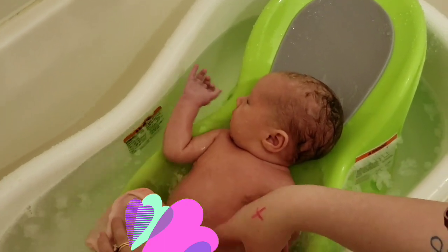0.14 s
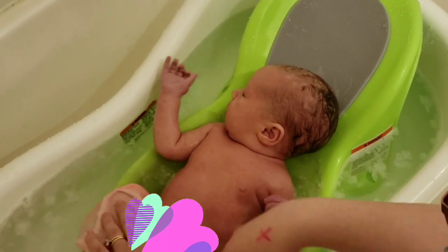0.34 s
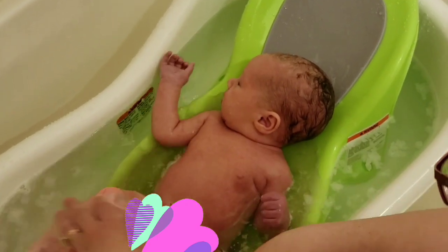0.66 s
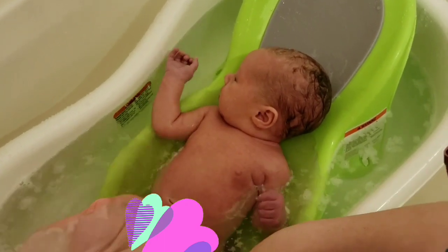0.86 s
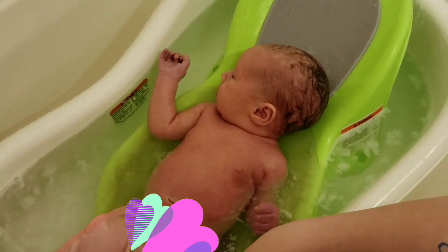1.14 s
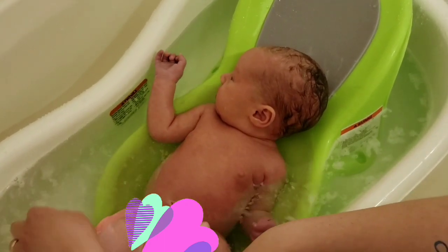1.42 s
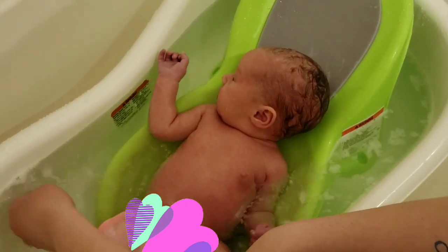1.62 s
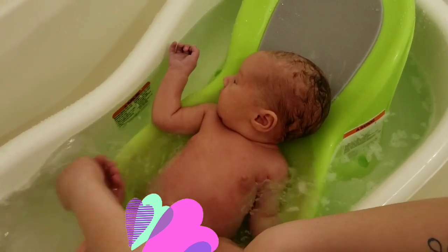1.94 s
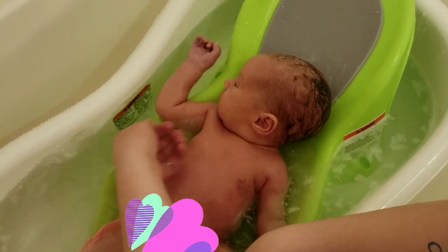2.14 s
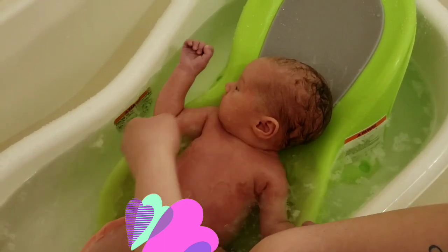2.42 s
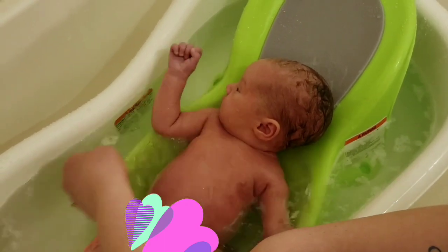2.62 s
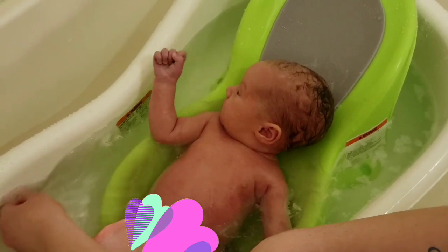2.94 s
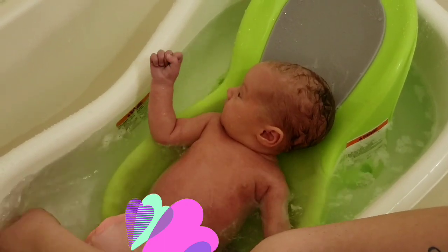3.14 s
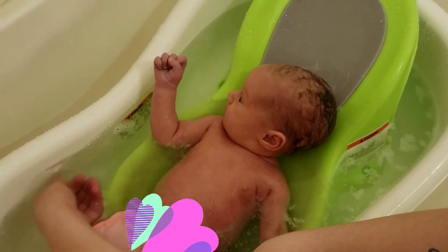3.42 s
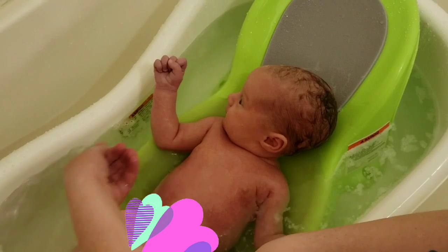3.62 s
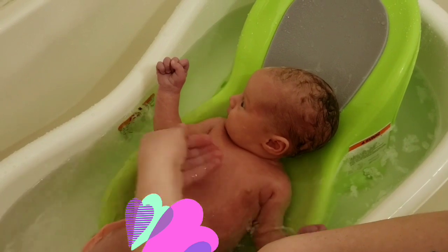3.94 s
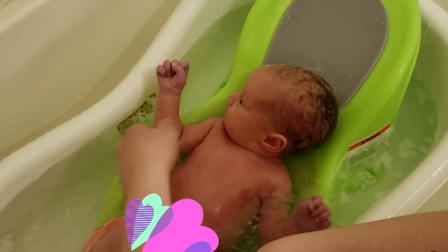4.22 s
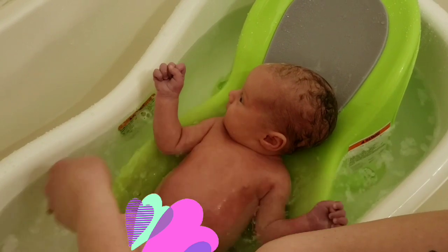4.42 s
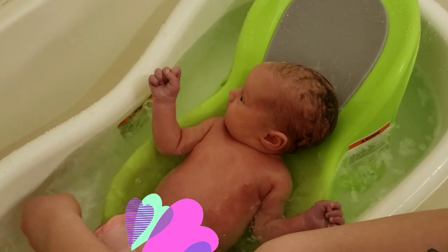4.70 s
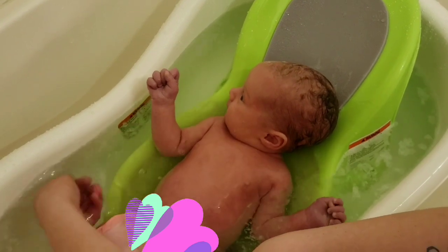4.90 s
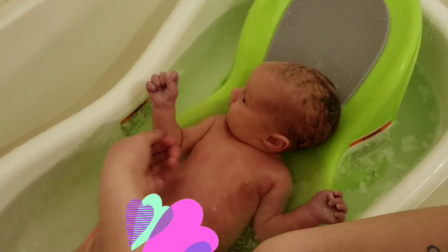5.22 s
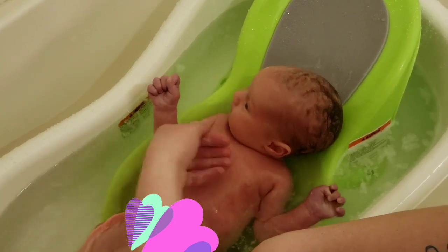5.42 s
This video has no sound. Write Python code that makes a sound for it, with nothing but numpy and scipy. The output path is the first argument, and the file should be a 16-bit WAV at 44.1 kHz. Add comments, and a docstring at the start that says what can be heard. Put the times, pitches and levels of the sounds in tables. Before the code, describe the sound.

Bathwater plops, drips and splashes lightly in a plastic tub as a hand scoops it, over a low fan hum.

```python
"""Small tiled bathroom: a hand scoops and pours bathwater in a plastic tub, close by.
Bubbles plop as short rising sines; droplets spatter as bursts of tiny clicks.
A thump and a knock ring the tub's modes; something wet squeaks thinly at the end.
Behind it, a fan hums through the room's low resonances."""
import sys
import numpy as np
from scipy import signal
from scipy.fft import rfft, irfft
from scipy.io import wavfile
from scipy.ndimage import uniform_filter1d

SR = 44100
rng = np.random.default_rng(int(sys.argv[2]) if len(sys.argv) > 2 else 0)


def unload_wav(signal):
    """Save mono or channel-first audio to the path in sys.argv[1] as 16-bit WAV at rate SR, clipped to [-1, 1]."""
    wavfile.write(
        sys.argv[1],
        SR,
        np.round(np.clip(np.atleast_2d(signal).T, -1, 1) * 32767).astype(np.int16),
    )


N = 245195
T = np.arange(N) / SR
HZ = np.maximum(np.fft.rfftfreq(N, 1 / SR), 1)

# fan noise spectrum: freq_hz, gain_db
FAN_SPECTRUM = [(12, -80), (20, -32), (24, -21), (35, -7.5), (59, -4.5), (72, -5.5), (92, -13.5),
                (112, -15.5), (225, -17), (390, -21.5), (427, -22.5), (573, -41), (797, -39), (1600, -54.5),
                (2080, -94), (3520, -120)]
# room resonances: freq_hz, width_hz, lift_db
ROOM_MODES = [(164.2, 31, 10.5), (226.2, 13, 7.5), (274, 65, 6.5), (418, 71, 2.5), (496, 78, 9),
              (780, 25, 3), (803, 14, 4), (985, 217, 6.5), (1340, 61, 10)]
# hiss spectrum: freq_hz, gain_db
HISS_SPECTRUM = [(940, -17), (1600, -1), (2190, -3), (2410, -5), (2920, -8), (3530, -6), (4190, -5.5),
                 (4570, -11.5), (6950, -17), (7650, -11.5), (8660, -15), (12300, -8), (14000, -14),
                 (15600, -20.5)]
# background left/right likeness: freq_hz, correlation
NOISE_CORRELATION = [(50, 0.97), (130, 1), (290, 0.91), (640, 0.5), (1400, -0.29), (2500, 0.089),
                     (6000, 0.14)]
# background balance, pan = left minus right: freq_hz, pan_db
NOISE_PAN = [(60, 5), (110, 0), (200, 2), (380, -0.5), (700, 6.5), (1290, 4.5), (2380, 1), (4400, 1.5),
             (8120, 1.5), (15000, -1.5)]
# low hum envelope: time_s, level_db
DRONE_LEVELS = [(0.0, -44), (0.52, -50.5), (0.56, -40), (0.74, -51.5), (1.08, -44), (1.15, -68),
                (1.21, -44.5), (1.47, -40), (1.61, -50.5), (2.68, -50), (2.82, -39), (2.91, -59),
                (3.13, -47.5), (3.51, -45), (3.59, -62), (3.79, -40), (4.07, -63.5), (4.96, -43.5),
                (5.22, -53), (5.25, -46.5), (5.34, -48), (5.4, -68), (5.47, -45), (5.56, -65)]
# higher hum envelope: time_s, level_db
WHIRR_LEVELS = [(0.0, -67.5), (0.34, -54.5), (0.42, -65), (0.74, -56), (0.84, -84), (0.9, -62), (2.42, -62),
                (2.69, -68), (2.82, -51), (3.05, -68.5), (3.11, -55), (3.39, -75), (3.48, -51.5),
                (3.53, -73), (4.07, -59), (4.1, -69.5), (4.52, -50.5), (4.57, -69), (4.91, -59.5),
                (5.2, -67.5), (5.53, -61), (5.56, -68)]
# tile reverb bands: centre_hz, t60_s, gain_db
TILE_BANDS = [(148, 0.12, -3), (500, 0.25, 0.5), (1550, 0.26, 4.5), (3900, 0.21, 5.5), (10300, 0.24, -2)]
# air modes between water and tub walls: freq_hz, gain_db, t60_s
CAVITY_MODES = [(1180, -36, 0.17), (1302, -39.5, 0.18), (1800, -35.5, 0.081), (2180, -60, 0.18)]
# wet squeak glide: time_s, pitch_hz, level_db
SQUEAK_GLIDE = [(5.425, 10800, -100), (5.446, 10875, -85), (5.464, 11040, -83), (5.476, 11190, -75),
                (5.512, 11700, -75), (5.53, 11860, -71.5), (5.546, 11950, -69.5), (5.56, 11800, -67)]
# plastic shell modes: freq_hz, gain_db, t60_s
TUB_MODES = [(62, -4.5, 0.075), (165, -0.5, 0.035), (248, 3, 0.035), (396, -0.5, 0.03), (720, -6, 0.016),
             (814, 0, 0.028), (930, -14, 0.027), (1010, -17, 0.026), (1180, -7.5, 0.03), (1250, -6, 0.013),
             (1380, -15, 0.024), (1660, -17, .015), (2480, -5.5, 0.0025), (3800, -1, 0.0018)]
# blows on the tub, less bass near the stiff rim: start_s, level_db, contact_ms, low_modes_db
TUB_BLOWS = [(1.006, -35, 2.94, 0), (1.019, -37, 14, 2), (1.044, -45, 3.1, 0), (1.069, -30.5, 10, -0.5),
             (1.086, -43, 8.4, 3), (1.1756, -46, 0.36, -1), (1.181, -38, 0.77, -2)]
# droplet click spectrum: freq_hz, gain_db
DROPLET_SPECTRUM = [(1500, -13.5), (3000, -17.5), (6000, -17.5), (8400, -10), (9100, -2), (10500, -1),
                    (12000, -1.5), (14000, -10.5), (16000, -20)]
# water running off the fingers, one envelope per run: time_s, level_db
TRICKLES = [
    [(1.74, -80), (1.85, -99), (2.0, -100)],
    [(2.15, -81), (2.28, -79), (2.4, -91), (2.52, -77.5), (2.65, -90), (2.8, -91)],
    [(3.05, -91), (3.17, -93), (3.3, -100), (3.45, -100)],
    [(3.54, -78), (3.62, -81.5), (3.75, -72.5), (3.9, -79), (4.02, -87), (4.12, -92), (4.22, -95),
     (4.35, -81), (4.45, -103)],
    [(4.58, -100), (4.7, -78.5), (4.85, -107), (5.05, -102), (5.15, -103), (5.25, -102)],
]
# droplets bursting on the water: start_s, level_db, ring_hz, large_drops_db, pan_db
DROPLET_BURSTS = [(1.174, -64, 9600, -9.5, 2), (1.748, -65, 9200, -24, 4), (1.79, -68, 10000, -14, -2),
                  (1.8026, -50, 10300, -24, 0), (2.163, -71, 9120, -15, 4), (2.2208, -67, 8900, -19, 1.5),
                  (2.2598, -63, 12160, -17, 1), (2.304, -64, 9450, -15, 4), (2.4432, -47.5, 12400, -16, -1),
                  (2.5608, -67, 11810, -18, 1), (2.584, -58.5, 10900, -17, -4), (2.8943, -83, 9500, -17, 3),
                  (3.078, -71.5, 9510, -10, 2), (3.113, -57.5, 11900, -17, -1),
                  (3.1625, -64.5, 12200, -31, -4), (3.2212, -66, 11800, -19, -2),
                  (3.3727, -77, 10400, -21, -1), (3.55, -80, 10500, -20, 0), (3.562, -64, 9600, -14, 4),
                  (3.57, -67, 10200, -18, 3), (3.6473, -72, 9420, -8, 0), (3.675, -74, 9100, -14, 1),
                  (3.708, -67, 10700, -18, -5), (3.7337, -54.5, 10300, -27, -2),
                  (3.819, -54.5, 12100, -26, -6), (3.857, -57.5, 9370, -21, 0),
                  (3.9115, -63, 11690, -18, -1.5), (3.962, -68, 12000, -20, -3),
                  (3.971, -53.5, 10300, -22, 1), (4.1634, -67.5, 11900, -25, -5),
                  (4.2026, -72, 11960, -27, -6), (4.2427, -73, 11500, -22, -2.5),
                  (4.2722, -67.5, 9640, -15, 6), (4.308, -68, 11800, -26, -6), (4.5999, -84, 9500, -22, 2),
                  (4.634, -70, 9200, -18, 5), (4.641, -62.5, 9300, -21, -2), (4.736, -61.5, 10000, -15, 0),
                  (5.0855, -78.5, 9500, -11, -0.5), (5.1264, -67, 9700, -15, -1)]
# bubbles closing under the surface: start_s, level_db, pitch_hz, ring_cycles, pan_db
PLOPS = [(1.003, -67.5, 3820, 11, 2), (1.004, -69, 7800, 20, 0), (1.749, -71, 5300, 14, 2),
         (1.805, -58, 5740, 11, 2), (1.81, -61.5, 2030, 5.7, 5), (2.031, -60, 1280, 3, 5),
         (2.036, -64, 1760, 3.6, -1), (2.144, -53.5, 1250, 5.9, 9), (2.158, -39, 1237, 8.7, 4),
         (2.1574, -67, 5140, 42, 4), (2.1576, -70, 6600, 40, 1), (2.159, -68, 2660, 14, 3),
         (2.222, -55.5, 6900, 7.4, 5), (2.226, -63, 7500, 14, 1), (2.26, -55.5, 2810, 6, 7),
         (2.266, -60, 2290, 11, 1), (2.308, -56, 3840, 9, 5), (2.325, -61.5, 2880, 9, 6),
         (2.395, -66, 4700, 10, 1), (2.446, -57, 2656, 7.1, 4), (2.462, -51.5, 5300, 10, 2),
         (2.5858, -54, 2420, 8, 3.5), (2.92, -68, 2230, 8, -3), (3.027, -70, 2920, 12, 7),
         (3.067, -61, 1640, 9.1, 9), (3.114, -62.5, 1600, 5.4, 5), (3.1145, -69, 4500, 9, 1),
         (3.115, -60.5, 2810, 7.5, 6), (3.618, -61, 2620, 8.1, 5), (3.6223, -47.5, 2180, 9.6, -1),
         (3.64, -60, 2010, 7.5, 0), (3.654, -49, 1440, 7.5, -1), (3.662, -54.5, 2530, 5.3, 2),
         (3.675, -42.5, 2090, 5.9, 0), (3.68, -50, 1590, 7, -5), (3.688, -46.5, 1170, 7.5, 1),
         (3.745, -62, 1780, 8.4, 4), (3.768, -53, 1850, 14, 0), (3.8, -65, 1790, 15, 0),
         (3.832, -76, 1800, 12, 1), (3.972, -63, 5870, 8, 0), (3.978, -60, 2850, 9, 4),
         (3.985, -66, 1930, 8.8, 1), (4.272, -61.5, 2730, 5.7, 3), (4.351, -63, 2080, 3, 0),
         (4.354, -64, 1340, 6.5, 4), (4.74, -64, 4900, 7, 0), (5.1248, -59, 4120, 9, 4),
         (5.14, -70, 4250, 7, 2), (5.128, -69, 2100, 8, -1), (5.153, -60, 4450, 7, -1),
         (5.165, -66, 4700, 7, -2), (5.388, -72, 2750, 9, -1)]


def undb(db):
    return 10 ** (np.asarray(db) / 20)


def unit_rms(x):
    return x / np.sqrt(np.mean(x ** 2))


def curve(table):
    """Table interpolated over HZ on a log axis."""
    freq_hz, values = np.transpose(table)
    return np.interp(np.log(HZ), np.log(freq_hz), values)


def shaped(x, gain):
    """Spectral filter, unit rms out."""
    return unit_rms(irfft(rfft(x) * gain, N))


def pan(pan_db):
    """Stereo gains; positive is left."""
    return undb(np.array([[.5], [-.5]]) * pan_db)


def add(out, start_s, x):
    i = int(start_s * SR)
    out[..., i:i + x.shape[-1]] += x[..., :N - i]


def wander(rate_hz):
    """Random steps smoothed twice, unit rms."""
    hold = int(SR / rate_hz)
    steps = np.repeat(rng.standard_normal(N // hold + 1), hold)
    return unit_rms(uniform_filter1d(uniform_filter1d(steps, hold), hold)[:N])


def sine(pitch_hz):
    """Unit-rms sine on a pitch track."""
    return np.sqrt(2) * np.sin(2 * np.pi * np.cumsum(pitch_hz) / SR)


def stereo_noise(spectrum_db):
    """Coloured noise, bass alike on both sides."""
    mid, side = rfft(rng.standard_normal((2, N))) * undb(spectrum_db)
    correlation = curve(NOISE_CORRELATION)
    mid, side = mid * np.sqrt(1 + correlation), side * np.sqrt(1 - correlation)
    return unit_rms(irfft(np.array([mid + side, mid - side]) * pan(curve(NOISE_PAN)), N))


def hiss(level_db=-78.5, flicker_db=1.75):
    """Faint hiss; each octave flickers on its own."""
    spectrum = rfft(stereo_noise(curve(HISS_SPECTRUM)))
    bands = (np.clip(1 - abs(np.log2(HZ / 1000) - octave), 0, 1) for octave in range(5))
    return sum(undb(level_db + flicker_db * wander(9)) * irfft(spectrum * band, N) for band in bands)


def hum(pitch_hz, levels, waver_db, drift_hz, rate_hz):
    """Sine wavering in level and pitch."""
    level_db = np.interp(T, *np.transpose(levels)) + waver_db * wander(rate_hz)
    return undb(level_db) * sine(pitch_hz + drift_hz * wander(rate_hz))


def fan(air_db=-46.5, mains_hz=118.9, mains_db=-54.5):
    """Air noise lifted by room resonances, a mains line, two hums."""
    lift_db = sum(db / (1 + (2 * (HZ - hz) / width_hz) ** 2) for hz, width_hz, db in ROOM_MODES)
    air = undb(air_db) * stereo_noise(curve(FAN_SPECTRUM) + lift_db)
    mains = undb(mains_db) * sine(np.full(N, mains_hz)) * pan(4.0)
    drone = hum(55.2, DRONE_LEVELS, waver_db=1.5, drift_hz=1.49, rate_hz=9) * pan(3.2)
    whirr = hum(426.6, WHIRR_LEVELS, waver_db=2.5, drift_hz=3.96, rate_hz=16) * pan(1.1)
    return air + mains + drone + whirr


def tiled_room(dry, direct_db=1.5, wet_db=6, round_trip_s=0.0088, flutter_depth=0.12):
    """Direct sound plus a dense tail that fades per band and flutters with the wall round trip."""
    t = T[:SR // 2]
    hz = np.maximum(np.fft.rfftfreq(len(t), 1 / SR), 1)
    noise = rfft(rng.standard_normal((2, len(t))))
    noise = np.where(hz < 800, noise[0], noise)  # long waves reach both sides alike
    centres_hz = np.array(TILE_BANDS)[:, 0]
    tail = 0
    for centre_hz, t60_s, gain_db in TILE_BANDS:
        band = np.interp(np.log(hz), np.log(centres_hz), centres_hz == centre_hz)
        tail += irfft(noise * band, len(t)) * undb(gain_db - 60 * t / t60_s)
    tail *= 1 + flutter_depth * np.cos(2 * np.pi * (t - .006) / round_trip_s)
    tail *= np.clip(t / 0.0014 - .5, 0, 1)
    tail *= undb(wet_db) / np.sqrt(np.sum(tail ** 2, axis=1, keepdims=True))
    return undb(direct_db) * dry + signal.fftconvolve(dry, tail, axes=1)[:, :N]


def tub_cavity(dry):
    """Air in the tub rings on after bubbles that match its modes."""
    t = T[:SR // 3]
    ring = sum(undb(db - 60 * t / t60_s) * np.sin(2 * np.pi * hz * t) for hz, db, t60_s in CAVITY_MODES)
    return signal.fftconvolve(dry, ring[None], axes=1)[:, :N]


def squeak(spacing_hz=3890, waver_hz=70, shake_db=3.0, fizz_db=-5.5):
    """Wet squeak: four shaky, evenly spaced partials rise and swell with some fizz."""
    time_s, glide_hz, level_db = np.transpose(SQUEAK_GLIDE)
    pitch_hz = np.interp(T, time_s, glide_hz) + waver_hz * wander(300)
    partials = sum(undb(gain_db + shake_db * wander(200)) * sine(pitch_hz + step * spacing_hz)
                   for step, gain_db in enumerate([-18, -10, 0, -17], start=-2))
    fizz = undb(fizz_db) * shaped(rng.standard_normal((2, N)), undb(curve(DROPLET_SPECTRUM)))
    return (partials + fizz) * undb(np.interp(T, time_s, level_db, left=-200)) * pan(-8)


def tub_blows(low_below_hz=500, detune=0.0065):
    """Soft thumps, then a hard knock; shorter contact reaches higher shell modes."""
    out, t = np.zeros(N), T[:SR // 2]
    for start_s, level_db, contact_ms, low_modes_db in TUB_BLOWS:
        ring = 0
        for hz, gain_db, t60_s in TUB_MODES:
            envelope = undb(gain_db + low_modes_db * (hz < low_below_hz) - 60 * t / t60_s)
            ring += envelope * np.sin(2 * np.pi * hz * t * (1 + detune * rng.standard_normal()))
        push = np.hanning(int(contact_ms * SR / 1000) + 3)
        add(out, start_s, -undb(level_db) * np.convolve(ring, push / push.sum()))
    return out * pan(4.2)


def droplet_clicks(clicks_per_s=9000, scatter_db=1.5, crossfeed=0.14, lag_s=0.00025):
    """Dense droplet impacts in three colours; larger drops sound lower."""
    clicks = (rng.random((2, N)) < clicks_per_s / SR) * rng.standard_normal((2, N))
    clicks *= undb(scatter_db * rng.exponential(size=(2, N)))
    clicks[1] += crossfeed * np.roll(clicks[0], int(lag_s * SR))
    fine = shaped(clicks, undb(curve(DROPLET_SPECTRUM)))
    large = shaped(np.roll(clicks, SR, axis=1), np.exp(-np.log(HZ / 5500) ** 2 / 0.16))
    bright = shaped(clicks, np.exp(-np.log(HZ / 11500) ** 2 / 0.21))
    return fine, large, bright


def trickle(fine, large, ramp_s=0.029):
    """Thin fizz of water running off the fingers."""
    envelope = 0
    for run in TRICKLES:
        time_s, level_db = np.transpose(run)
        gate = np.clip(np.minimum(T - time_s[0], time_s[-1] - T) / ramp_s, 0, 1)
        envelope += undb(np.interp(T, time_s, level_db)) * gate
    return (fine + 0.092 * large) * envelope


def spatter(fine, large, bright, ring_share=0.56, ring_width_hz=900, rise_s=0.0023, tick_s=0.00077):
    """Droplets hit the water: sharp tick, then a ringing burst. Louder bursts fade faster."""
    out, t = np.zeros((2, N)), T[:SR // 4]
    for start_s, level_db, ring_hz, large_drops_db, pan_db in DROPLET_BURSTS:
        span = np.s_[:, int(start_s * SR):int(start_s * SR) + len(t)]
        resonator = signal.iirpeak(ring_hz, ring_hz / ring_width_hz, fs=SR)
        ring = unit_rms(signal.lfilter(*resonator, fine[span]))
        drops = ring_share * ring + (1 - ring_share) * fine[span] + undb(large_drops_db) * large[span]
        fade_db_per_s = max(1143 + 46 * (level_db + 60), 300)
        envelope = undb(-fade_db_per_s * t) * np.minimum(t / rise_s, 1)
        tick = undb(0.5) * np.exp(-t / tick_s) * bright[span]
        add(out, start_s, (drops * envelope + tick) * undb(level_db) * pan(pan_db))
    return out


def bubble(pitch_hz, ring_cycles, glide=0.023):
    """One bubble: brief ring, pitch rising as it nears the surface."""
    cycles = pitch_hz * T[:SR // 20]
    wave = np.sin(2 * np.pi * cycles * (1 - glide / 2 + glide * cycles / (2 * ring_cycles)))
    attack = np.minimum(cycles / (0.39 * ring_cycles), 1)
    return wave * attack * np.exp(-2 * cycles / ring_cycles)


def trickle_bubbles(bubbles_per_s=60):
    """Tiny stray bubbles that follow the trickle's level."""
    out = np.zeros((2, N))
    for run in TRICKLES:
        time_s, level_db = np.transpose(run)
        length_s = time_s[-1] - time_s[0]
        for when, pitch, softness, side in rng.random((int(bubbles_per_s * length_s), 4)):
            start_s = time_s[0] + when * length_s
            gain = undb(np.interp(start_s, time_s, level_db) + 10 - 26 * softness) * pan(8 * side - 4)
            add(out, start_s, gain * bubble(6000 * 1.2 ** pitch, ring_cycles=19))
    return out


def gurgle(start_s=3.63, length_s=0.2, low_hz=1120, high_hz=2750, level_db=-59, fade_db=17, count=24):
    """Bubble swarm trapped by the scooping hand."""
    out = np.zeros((2, N))
    for when, pitch, side in rng.random((count, 3)):
        pitch_hz = low_hz * (high_hz / low_hz) ** pitch
        gain = undb(level_db - fade_db * when) * pan(3 + 8 * side)
        add(out, start_s + length_s * when, gain * bubble(pitch_hz, ring_cycles=6.5))
    return out


def plops(follower_db=-11.5, follower_cap_db=-62.5, within_s=0.012, pitch_spread=0.11):
    """Distinct bubbles closing under water, each with three fainter followers."""
    out = np.zeros((2, N))
    for start_s, level_db, pitch_hz, ring_cycles, pan_db in PLOPS:
        add(out, start_s, undb(level_db) * pan(pan_db) * bubble(pitch_hz, ring_cycles))
        follower_gain = undb(min(level_db + follower_db, follower_cap_db)) * pan(pan_db)
        for when, pitch in rng.random((3, 2)):
            follower_hz = pitch_hz * (1 + pitch_spread * (2 * pitch - 1))
            add(out, start_s + within_s * when, follower_gain * bubble(follower_hz, ring_cycles=4.4))
    return out


def scene():
    """Water and tub through the room; cavity ring, background and squeak added direct."""
    bubbles = plops() + gurgle() + trickle_bubbles()
    fine, large, bright = droplet_clicks()
    droplets = spatter(fine, large, bright) + trickle(fine, large)
    return tiled_room(bubbles + droplets + tub_blows()) + tub_cavity(bubbles) + hiss() + fan() + squeak()


def record(dry, cutoff_hz=15720):
    """Phone's steep low-pass."""
    return signal.sosfilt(signal.ellip(10, .2, 70, cutoff_hz, fs=SR, output="sos"), dry)


dry = scene()
out = record(dry)
unload_wav(out)
```